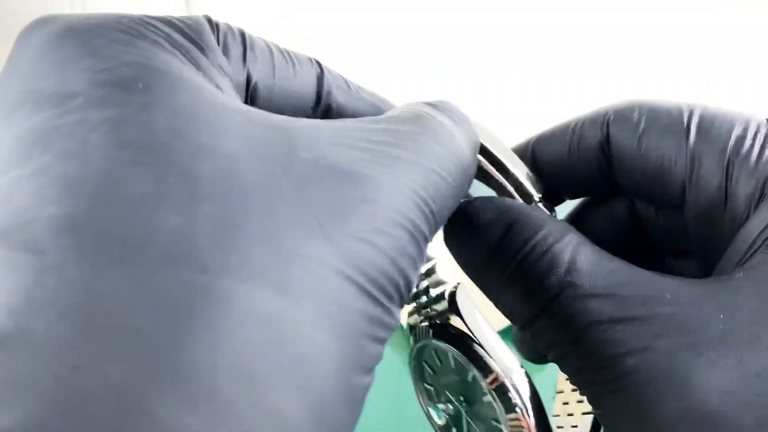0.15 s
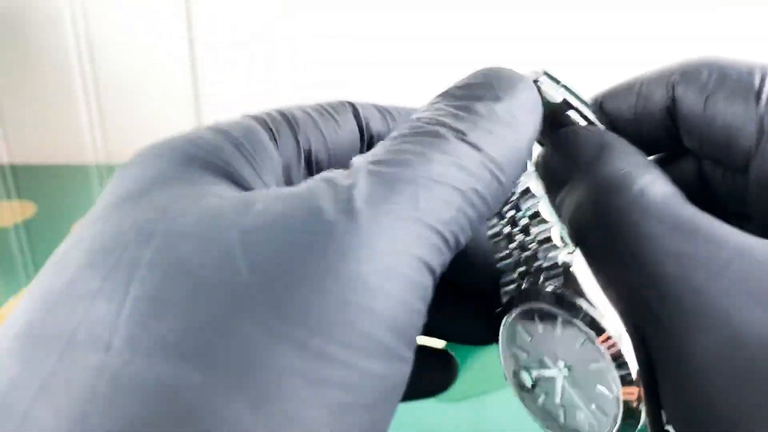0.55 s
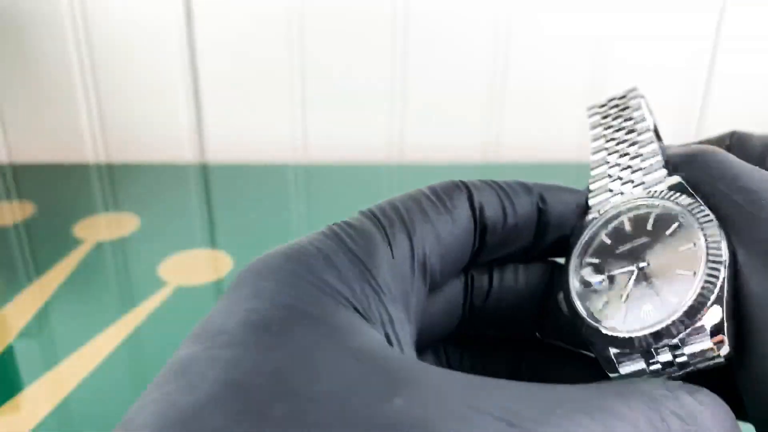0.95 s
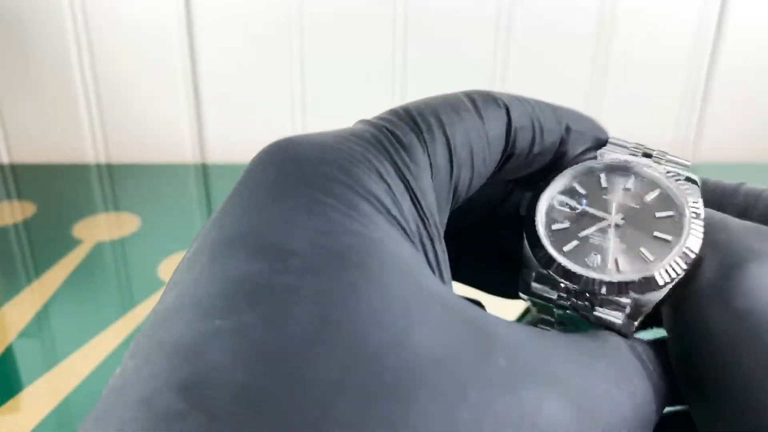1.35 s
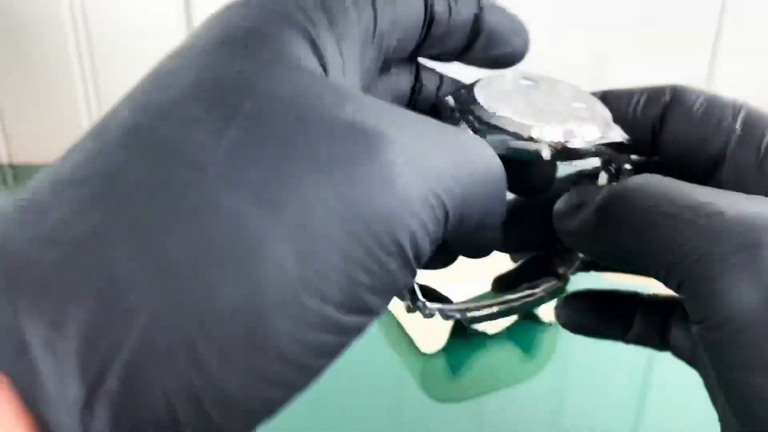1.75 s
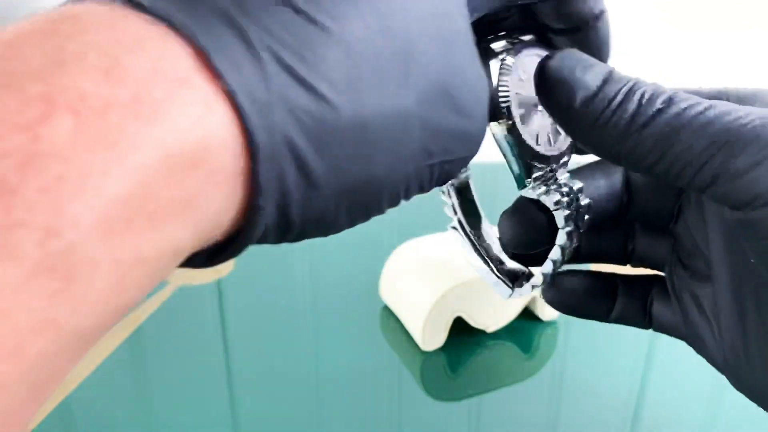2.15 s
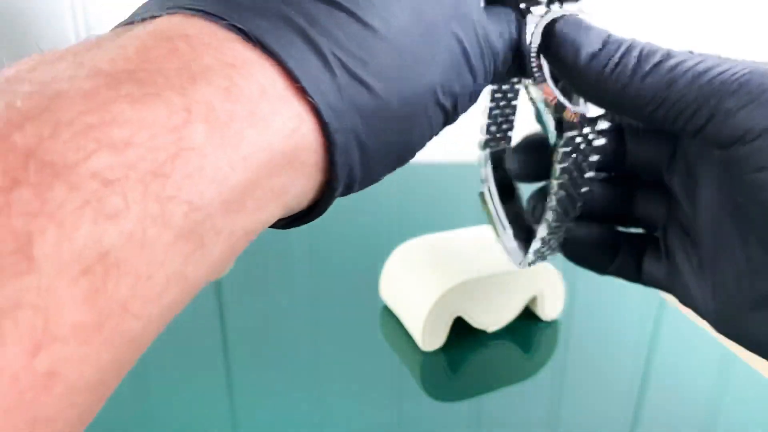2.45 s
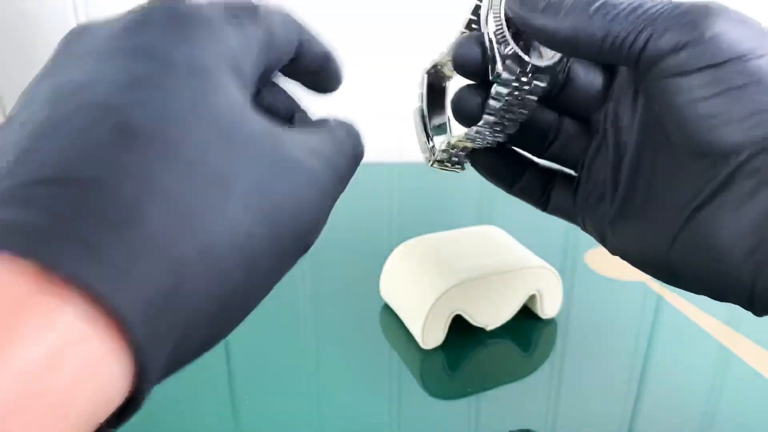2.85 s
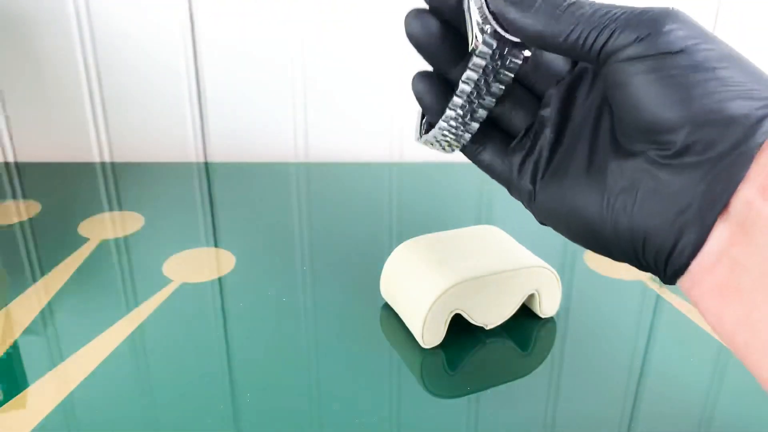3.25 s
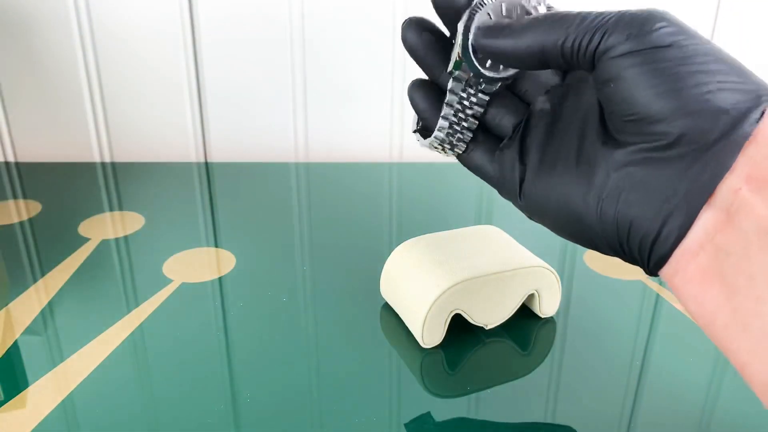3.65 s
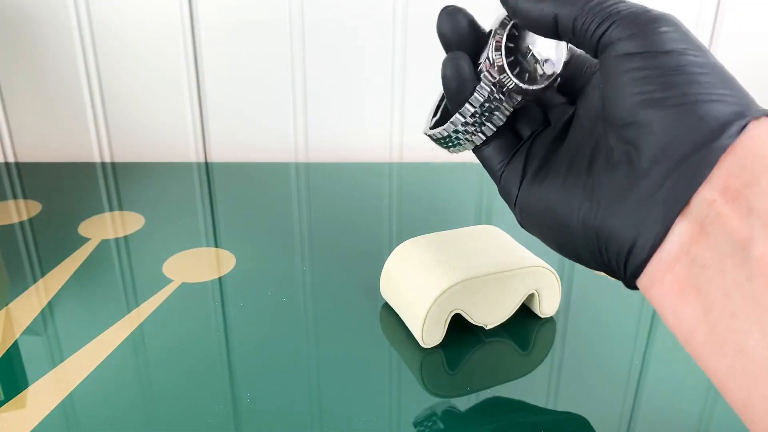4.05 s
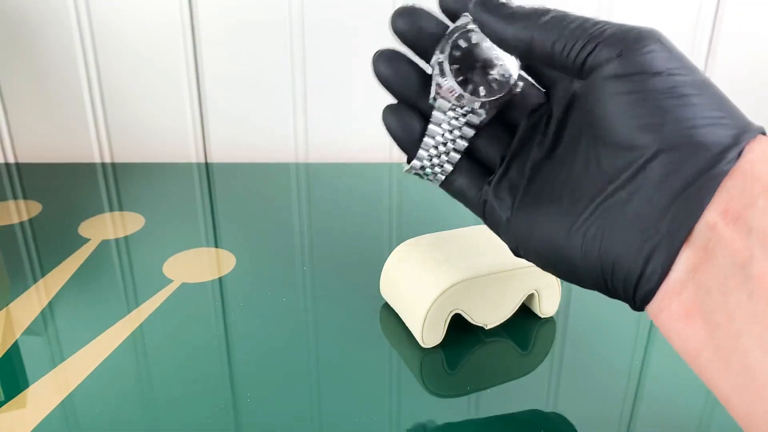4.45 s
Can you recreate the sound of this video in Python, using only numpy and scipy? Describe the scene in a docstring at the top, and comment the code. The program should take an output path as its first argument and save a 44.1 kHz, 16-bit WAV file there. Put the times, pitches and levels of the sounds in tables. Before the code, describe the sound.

A steel watch clasp snaps shut with one loud, bright click, then links clink lightly as gloved hands turn the watch over.

```python
"""Small damped room with a low rumble: a steel watch clasp snaps shut, then gloved hands turn the watch over.
Clasp, links and table ring as decaying modes struck by rattling contacts, each with a dry crack on top.
Glove rustle is noise in uneven grains; rubber pops through short resonances and drags as narrow noise.
Two ports pick it up: nearly alike in the bass, different in the middle, one signal in the treble, right
side ahead."""
import sys
import numpy as np
from scipy import signal
from scipy.fft import rfft, irfft
from scipy.io import wavfile
from scipy.ndimage import uniform_filter1d

SR = 44100
rng = np.random.default_rng(int(sys.argv[2]) if len(sys.argv) > 2 else 0)


def pcm_store(signal):
    """Save signal as 16-bit PCM."""
    levels = np.round(np.clip(np.atleast_2d(signal), -1, 1) * 32767)
    wavfile.write(sys.argv[1], SR, levels.astype(np.int16).T)


N = 202838

# clasp snap: time_s, dry_peak_db, rattle_ms
CLASP_SNAP = (.5186, -2.8, 1.6)
# modes of the finger-held clasp: freq_hz, level_db, t60_s
CLASP_MODES = [(220.1, -23.5, 0.023), (414, -25, 0.016), (717, -23.5, 0.013), (1010, -21, .012),
               (1350, -7.5, 0.0034), (2200, -20, 0.018), (2700, -20, 0.0034), (3190, -5.5, 0.0084),
               (4200, -18.5, 0.0056), (4800, -10.5, 0.004), (5600, -12, 0.0062), (6410, -9, 0.0097),
               (7400, -14.5, 0.0044), (8180, -1, 0.003), (9300, -1.5, 0.0094), (10080, -4.5, 0.019),
               (10620, 1.5, 0.0013), (12880, -3, 0.0049), (12770, 1, 0.005), (15200, -9, 0.0074)]
# clear link contacts: time_s, dry_peak_db, middle_modes_rel_db, rattle_ms
LINK_CLINKS = [(0.134, -39, 25, 3), (0.3308, -42.5, -14, 1.9), (0.802, -44, 17.5, 3.6),
               (0.9067, -42, 15, 1.15), (1.1207, -44, 5.5, 1.96), (1.1533, -43.5, 5, 1.3),
               (1.3305, -30, -7, 1.7), (1.362, -21, -2, 2.4), (1.404, -28, -5, 2), (1.411, -32, -3, 1.2),
               (1.424, -29, 3.5, 4), (1.47, -14.5, 3, 0.93), (1.509, -35, 0, 1.7), (1.5408, -33, -2, 1.28),
               (1.63, -40, 7, 1.26), (1.66, -34, 3.5, 1.8), (1.712, -35.5, 4, 2.4), (1.741, -44, 10, 1.5),
               (1.748, -30, 0.5, 1.4), (1.8587, -27.5, 8, 8.6), (1.9492, -35, -15, 3.6),
               (2.064, -36.5, 12.5, 4), (2.1386, -20.5, 16, 1.98), (2.262, -33.5, 6.5, 6.6),
               (2.3568, -25, 5, 5.5), (2.3977, -33, 11.5, 1.13), (2.4232, -28, -19, 3),
               (2.465, -23, -0.5, 4.7), (2.499, -37, 4, 0.78), (2.5686, -35, -8, 1.3),
               (2.645, -43, -2, 1.5), (2.6568, -39, 12, 3.8), (2.844, -42.5, 2, 2.9), (2.972, -42.5, 3, 3),
               (3.0267, -39, -4, 1.5), (3.037, -36, -2, 3.8), (3.0572, -30, -21, 5), (3.1612, -34, -6, 5.7),
               (3.7972, -44.5, 21.5, 2), (4.1541, -35.5, 9.5, 2.8), (4.238, -55, 5, 3),
               (4.2827, -40, -11, 4), (4.307, -39, -7, 1.6), (4.313, -37.5, -8, 1.5), (4.3644, -41, -14, 3)]
# modes of the steel links: freq_hz, level_db, t60_s
LINK_MODES = [(2580, -14, 0.0064), (4310, -9.5, 0.0099), (5050, -8, 0.0035), (6140, -8, 0.018),
              (7270, -6, 0.0021), (8185, 2.5, 0.01), (9444, 4, 0.0062), (10570, 5, 0.018),
              (11370, 4.5, 0.0025), (11920, 9, 0.019), (14200, 5, 0.0035), (14780, -11.5, 0.0039),
              (15800, -7, 0.0025)]
# gloves sliding: time_s, treble_rms_db, middle_rms_db
GLOVE_SLIDES = [(0.0, -96.5, -80), (0.128, -74.5, -74.5), (0.449, -79, -79.5), (0.739, -81, -85),
                (0.86, -77.5, -78), (1.15, -83, -86.5), (1.301, -66, -84), (1.6, -65, -73),
                (1.979, -68, -73.5), (2.189, -60.5, -56.5), (2.305, -67, -78.5), (2.842, -72, -72.5),
                (3.111, -67, -82), (3.522, -70, -75.5), (3.85, -78.5, -89), (4.102, -81.5, -77.5),
                (4.221, -63, -72), (4.6, -78.5, -94)]
# short rubs of glove on bracelet: mid_time_s, treble_rms_db, middle_rms_db, half_width_ms
GLOVE_RUBS = [(0.868, -67.5, -73, 16), (1.246, -63.5, -96, 21), (1.401, -59.5, -69.5, 34),
              (1.35, -50, -73, 4), (1.925, -55, -62, 30), (2.266, -65, -65, 10), (2.363, -59, -62, 12.4),
              (2.423, -50.5, -92, 5.7), (3.056, -53, -94, 13), (3.162, -71, -78, 30),
              (3.658, -59, -65, 13.4), (3.827, -72, -73.5, 30), (4.316, -62.5, -73, 16.7),
              (4.489, -95, -64, 23.6)]
# sleeve scuffing the table: start_s, level_db, length_s (attack included, release excluded)
SLEEVE_SCUFFS = [(2.653, -72.5, 0.17)]
# rubber folds popping: time_s, dry_peak_db, pitch_hz
RUBBER_POPS = [(0.074, -52, 2000), (0.402, -56, 1964), (0.798, -51.5, 654), (0.87, -56.5, 794),
               (1.6192, -49.5, 1970), (2.3418, -56, 2240), (2.3654, -36, 2450), (2.4799, -43.5, 2590),
               (2.4942, -45, 2420), (2.916, -48, 2230), (3.8009, -53, 2370), (3.905, -64.5, 758),
               (4.0478, -53.5, 2010), (4.322, -44, 2110), (4.4814, -45.5, 1980)]
# rubber dragging: mid_time_s, rms_db, pitch_hz, width_hz, gaussian_sigma_ms
RUBBER_DRAGS = [(2.685, -63.5, 360, 300, 14), (2.1, -77, 1600, 580, 10), (2.745, -72, 2000, 220, 31),
                (2.855, -66.5, 2300, 1100, 22)]
# dull knocks on the table: time_s, dry_peak_db, low_modes_rel_db, scrape_rel_db
TABLE_KNOCKS = [(1.732, -59.5, 19, 6), (1.86, -34.5, -2, 5), (2.139, -38, -4, 3.5), (2.195, -37, 0.5, -4.5)]
# modes of the table top: freq_hz, level_db, t60_s
TABLE_MODES = [(200, -5.5, 0.051), (247, 1.5, 0.031), (344.6, 1, 0.028), (435, -2, 0.03),
               (523.5, -5.5, 0.035), (695, 1, 0.024), (896, -1, 0.0081), (1153, 4, 0.014)]
# late deep bass of the table knocks, and other soft low thumps: time_s, dry_peak_db
LOW_THUMPS = [(1.902, -55), (2.226, -51), (4.057, -61), (4.333, -60.5)]
# deep modes under a thump: freq_hz, level_db, t60_s
THUMP_MODES = [(102, -10, 0.09), (186, -1.5, 0.016)]
# room decay: freq_hz, t60_s
ROOM_DECAY = [(150, 0.24), (600, 0.26), (2000, 0.23), (6000, 0.2), (14000, 0.14)]
# room tone spectrum: freq_hz, relative_density_db
ROOM_TONE = [(20, -3), (30, 9.5), (60, 2), (105, -2.5), (170, -9), (500, -18), (1400, -24.5), (3000, -45),
             (6000, -40.5), (10000, -26.5), (14000, -41.5), (16500, -39)]
# left minus right port: freq_hz, difference_db
PORT_BALANCE = [(500, 0), (2200, 3.5), (4500, 1), (7000, 0), (9000, -0.1)]

# dry crack of a contact: peak re ring (dB), mean delay of its pitch regions (ms)
SNAP_CRACK, CLINK_CRACK = (6.5, 0.823), (2.9, 0.64)
POP_CRACK, KNOCK_CRACK = (-1.7, 1.558), (3.4, 5.3)
POP_RATTLE_MS, KNOCK_RATTLE_MS = 3.1, 9.3
# bending waves: the bass comes late
TABLE_RISE_CYCLES, TABLE_LATE_CYCLES = 1.4, 2.24
# faint clinks: peak over the treble slide level, with a one-sided exponential scatter
FAINT_COUNT, FAINT_OVER_DB, FAINT_MEAN_SCATTER_DB = 100, 13.5, 1.5
FAINT_MIDDLE_REL_DB, FAINT_RATTLE_MS = -4, 2.7
SCUFF_ATTACK_S, SCUFF_RELEASE_S, SLEEVE_REST_DB = 0.014, 0.19, -88.5
FLUTTER_HZ, FLUTTER_DRAW_DB = 30.067, 2.5
# echo energy re dry; extra early part, re the tail at its start
CLINK_WET_DB, SNAP_WET_DB, KNOCK_WET_DB = -5, -8.5, 0
EARLY_DB, SNAP_EARLY_DB, EARLY_T60_S = 1.5, -9.5, .05
TONE_RMS_DB = -70
ALIKE_HZ, SHARED_HZ, SHARED_GAIN = 704, 8380, 1
IN_STEP_HZ, TURN_HZ, TOP_HZ = 9014, 4890, 16000


def clasp():
    """Clasp snap: a tight crack and a brief ring reaching down into the bass."""
    out = np.zeros((2, N))
    time_s, peak_db, ms = CLASP_SNAP
    struck = ring(CLASP_MODES, 0, 0.41, size=1200, late=0.69)
    rung = signal.fftconvolve(struck, rattle(ms, 4.1, 0.18), axes=1)[:, :2048]
    add(out, time_s, cracked(rung, CLASP_MODES, 0, SNAP_CRACK), peak_db)
    return out


def links():
    """Short rattles of contacts crack and ring the damped links, differently each time."""
    out = np.zeros((2, N))
    middle = (np.transpose(LINK_MODES)[0] < 7000)[:, None]
    for time_s, peak_db, middle_db, ms in LINK_CLINKS + faint_clinks():
        extra_db = middle * middle_db
        rung = ring(LINK_MODES, extra_db, 2.5, size=1024, detune=0.043)
        contact = cracked(rung, LINK_MODES, extra_db, CLINK_CRACK)
        start_s = time_s - 0.36 * ms / 1000  # the run swells before its main contact
        add(out, start_s, signal.fftconvolve(contact, rattle(ms, 2.7, 0.28), axes=1), peak_db)
    return out


def faint_clinks():
    """Clink rows at chance times, denser and louder where the gloves slide loudly in the treble."""
    t = np.arange(0, N / SR - .1, .001)
    slide_s, treble_db, _ = np.transpose(GLOVE_SLIDES)
    slide_db = np.interp(t, slide_s, treble_db)
    busy = np.cumsum(undb(slide_db))
    chance = rng.random((FAINT_COUNT, 2))
    when_s = np.interp(chance[:, 0], busy / busy[-1], t)
    scatter_db = -FAINT_MEAN_SCATTER_DB * np.log(1 - chance[:, 1])
    peak_db = np.interp(when_s, t, slide_db) + FAINT_OVER_DB + scatter_db
    return [(s, db, FAINT_MIDDLE_REL_DB, FAINT_RATTLE_MS) for s, db in zip(when_s, peak_db)]


def gloves():
    """Dense stick-slip grains in three bands: treble and middle follow slides and rubs, low the sleeve."""
    t = np.arange(N) / SR
    slide_s, *levels = np.transpose(GLOVE_SLIDES)
    treble, middle = [undb(np.interp(t, slide_s, db)) ** 2 for db in levels]
    for mid_s, treble_db, middle_db, ms in GLOVE_RUBS:
        swell = np.exp(-((t - mid_s) * 1000 / ms) ** 2)
        treble = treble + undb(2 * treble_db) * swell
        middle = middle + undb(2 * middle_db) * swell
    # the grip comes and goes many times a second
    hold = int(SR / FLUTTER_HZ)
    flutter = undb(FLUTTER_DRAW_DB * smooth_steps(hold, hold))
    out = 0
    bands = [(4900, 14600, 3.8), (1640, 5050, 2), (219, 670, 1.4)]  # lo_hz, hi_hz, grain_spread_db
    for power, (lo_hz, hi_hz, spread_db) in zip([treble, middle, sleeve(t)], bands):
        # grain sizes shared by the ports, in clusters a few ms long
        size = undb(spread_db * smooth_steps(96, 48))
        grains = band(rng.standard_normal((2, N)) * size * flutter, lo_hz, hi_hz)
        out = out + np.sqrt(power) * unit(grains)
    return out


def sleeve(t):
    """Power of the sleeve scuffs: attack, hold, release over a faint rest."""
    power = undb(2 * SLEEVE_REST_DB)
    for start_s, db, length_s in SLEEVE_SCUFFS:
        attack = (t - start_s) / SCUFF_ATTACK_S
        release = 1 + (start_s + length_s - t) / SCUFF_RELEASE_S
        power = power + (undb(db) * np.clip(np.minimum(attack, release), 0, 1)) ** 2
    return power


def creaks():
    """Stretched rubber lets go: a few pops through broad, short resonances."""
    out = np.zeros((2, N))
    for time_s, peak_db, hz in RUBBER_POPS:
        modes = [(.82 * hz, -3, .007), (hz, 0, .008), (1.25 * hz, -3, .006),
                 (1.6 * hz, -7, .005), (2.2 * hz, -10, .004)]
        pops = rattle(POP_RATTLE_MS, 2.9, 0.36)
        rung = signal.fftconvolve(ring(modes, 0, 0.23, size=600), pops, axes=1)[:, :2048]
        add(out, time_s, cracked(rung, modes, 0, POP_CRACK), peak_db)
    return out


def drags():
    """Rubber friction: noise through one resonance for each drag."""
    t = np.arange(N) / SR
    out = 0
    for mid_s, db, hz, width_hz, ms in RUBBER_DRAGS:
        swell = np.exp(-.5 * ((t - mid_s) * 1000 / ms) ** 2)
        friction = band(rng.standard_normal((2, N)), hz - width_hz / 2, hz + width_hz / 2)
        out = out + undb(db) * swell * unit(friction)
    return out


def knocks():
    """A soft, dragging blow rings the table under a noise scrape; soft thumps ring deep modes only."""
    out = np.zeros((2, N))
    t = np.arange(3000) / SR * 1000 / KNOCK_RATTLE_MS
    low = (np.transpose(TABLE_MODES)[0] < 580)[:, None]
    for time_s, peak_db, low_db, scrape_db in TABLE_KNOCKS:
        struck = ring(TABLE_MODES, low * low_db, 1.0, size=6000,
                      cycles=TABLE_RISE_CYCLES, late=TABLE_LATE_CYCLES)
        rung = signal.fftconvolve(struck, rattle(KNOCK_RATTLE_MS, 2.2, 0.58), axes=1)[:, :8192]
        add(out, time_s, cracked(rung, TABLE_MODES, low * low_db, KNOCK_CRACK), peak_db)
        scrape = band(rng.standard_normal((2, len(t))), 1400, 7100)
        add(out, time_s, scrape * np.minimum(t / 0.39, 1) * np.exp(-1.2 * t), peak_db + scrape_db)
    for time_s, peak_db in LOW_THUMPS:
        thump = ring(THUMP_MODES, 0, 0.73, size=9000)[:1]
        add(out, time_s, thump * np.ones((2, 1)), peak_db)  # same at both ports
    return out


def room(x, wet_db, early_db):
    """Diffuse echoes after a short gap: near table and wall first, each octave dying at its own rate."""
    t = np.arange(SR // 3) / SR
    noise = rng.standard_normal((2, len(t)))
    tail = 0
    for hz in 60 * 2. ** np.arange(9):
        octave = band(noise, hz / np.sqrt(2), hz * np.sqrt(2))
        tail = tail + octave * 1000. ** (-t / on_hz(ROOM_DECAY, hz))
    onset = np.clip((t - .001) / 0.00037, 0, 1)
    tail = tail * onset * (1 + undb(early_db) * 1000. ** (-t / EARLY_T60_S))
    tail = tail / np.sqrt((tail ** 2).sum() / 2)
    return x + undb(wet_db) * signal.fftconvolve(x, tail, axes=1)[:, :N]


def room_tone():
    """Steady rumble with a faint hiss: noise shaped in frequency."""
    hz = np.arange(N // 2 + 1) * SR / N
    spectrum = rfft(rng.standard_normal((2, N))) * undb(on_hz(ROOM_TONE, hz)) * (hz > 15)
    return undb(TONE_RMS_DB) * unit(irfft(spectrum, N))


def ring(modes, extra_db, scatter_db, size, detune=0.0059, cycles=0.94, late=0):
    """One blow on decaying modes, weighed and tuned anew each time, with other phases at each port."""
    hz, db, t60_s = np.transpose(modes)[:, :, None]
    t = np.maximum(np.arange(size) / SR - late / hz, 0)  # late: delay in cycles
    chance = rng.standard_normal((len(modes), 2))
    phase = rng.uniform(0, 2 * np.pi, (2, len(modes), 1))
    gain = undb(db + extra_db + scatter_db * chance[:, :1])
    rise = np.minimum(t * hz / cycles, 1)  # a soft contact lasts more cycles
    tuned_hz = hz * (1 + detune * chance[:, 1:])
    wave = np.sin(2 * np.pi * tuned_hz * t + phase)
    return (gain * rise * wave * 1000. ** (-t / t60_s)).sum(axis=1)


def rattle(ms, per_ms, bounce):
    """A main contact amid a quick run of lesser ones that swells fast and dies away on the scale ms."""
    t = np.arange(SR // 20) / SR * 1000
    hit = rng.random(len(t)) < per_ms * 1000 / SR
    touch = bounce * hit * rng.standard_normal(len(t))
    t = t / max(ms, .2)
    touch[np.searchsorted(t, .3)] = 1
    return (touch * np.minimum(t / 1.4, 1) * np.exp(-1.6 * t))[None]


def cracked(rung, modes, extra_db, crack):
    """Add a dry crack coloured broadly like the modes; each pitch region is a little late, by chance."""
    db, ms = crack
    size = rung.shape[1]
    mode_hz, mode_db, _ = np.transpose(modes)
    colour = sorted(zip(mode_hz, mode_db + np.ravel(extra_db)))
    hz = np.arange(size // 2 + 1) * SR / size
    low_skirt = np.minimum(hz / colour[0][0], 1) ** 2
    high_skirt = np.minimum(colour[-1][0] / (hz + 1), 1) ** 2
    draws_s = rng.gamma(2, ms / 2000, (2, len(hz) // 16 + 1))
    late_s = uniform_filter1d(np.repeat(draws_s, 16, axis=1), size=16)[:, :len(hz)]
    turn = -2 * np.pi * np.cumsum(late_s, axis=1) * SR / size  # phase from group delay
    spectrum = undb(on_hz(colour, hz)) * low_skirt * high_skirt * np.exp(1j * turn)
    click = irfft(spectrum, size) * np.linspace(1, 0, size) ** 2
    return rung + click * undb(db) * np.abs(rung).max() / np.abs(click).max()


def add(track, time_s, sound, peak_db):
    """Mix a sound into the track with the given peak."""
    i = int(time_s * SR)
    sound = sound[:, :N - i]
    track[:, i:i + sound.shape[1]] += sound * undb(peak_db) / np.abs(sound).max()


def smooth_steps(hold, size):
    """Random steps of hold samples, smoothed by a moving mean of size samples."""
    steps = np.repeat(rng.standard_normal(N // hold + 1), hold)[:N]
    return uniform_filter1d(steps, size=size)


def undb(db):
    """Decibels to amplitude."""
    return 10 ** (np.asarray(db) / 20)


def on_hz(table, hz):
    """Read a (freq_hz, value) table on a log-frequency axis."""
    f, v = np.transpose(table)
    return np.interp(np.log(np.maximum(hz, 1)), np.log(f), v)


def band(x, lo_hz, hi_hz):
    """Butterworth band-pass."""
    sos = signal.butter(2, [lo_hz, min(hi_hz, .49 * SR)], "band", fs=SR, output="sos")
    return signal.sosfilt(sos, x)


def unit(x):
    """Scale to unit rms."""
    return x / np.sqrt(np.mean(x ** 2))


def scene():
    """Clasp, handling and knocks, each with its own share of echo, over the room tone."""
    snap = room(clasp(), SNAP_WET_DB, SNAP_EARLY_DB)
    handling = room(links() + gloves() + creaks() + drags(), CLINK_WET_DB, EARLY_DB)
    return snap + handling + room(knocks(), KNOCK_WET_DB, EARLY_DB) + room_tone()


def record(dry):
    """Bass nearly alike at both ports; left treble feeds both sides, right a little ahead; low-pass."""
    hz = np.arange(N // 2 + 1) * SR / N
    left, right = rfft(dry)
    bass_share = 0.96 / (1 + (hz / ALIKE_HZ) ** 2)
    treble_share = SHARED_GAIN / (1 + (SHARED_HZ / (hz + 1)) ** 30)
    share = np.clip(bass_share + treble_share, 0, 1)
    right = share * left + np.sqrt(1 - share ** 2) * right
    # one turn of phase per TURN_HZ, none at IN_STEP_HZ, fading out below SHARED_HZ
    turns = (hz - IN_STEP_HZ) / TURN_HZ * np.clip(hz / SHARED_HZ, 0, 1) ** 6
    lead = np.exp(2j * np.pi * turns)
    tilt = undb(on_hz(PORT_BALANCE, hz) / 2)
    ports = irfft(np.array([left * tilt, right * lead / tilt]), N)
    return signal.sosfilt(signal.ellip(8, .2, 70, TOP_HZ, fs=SR, output="sos"), ports)


dry = scene()
out = record(dry)
pcm_store(out)
```